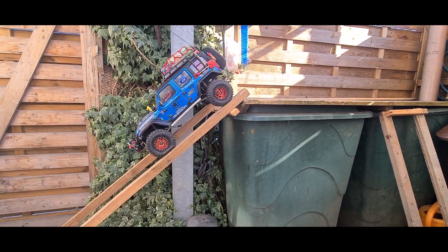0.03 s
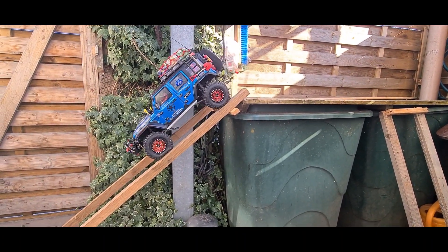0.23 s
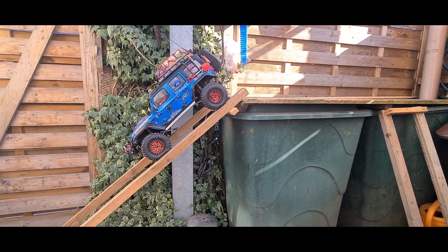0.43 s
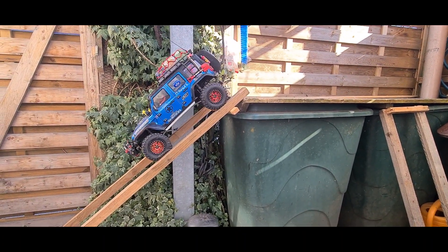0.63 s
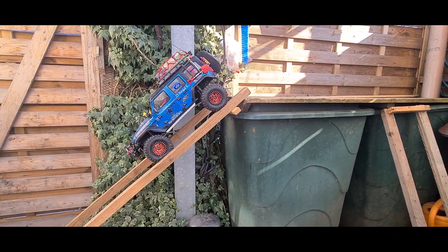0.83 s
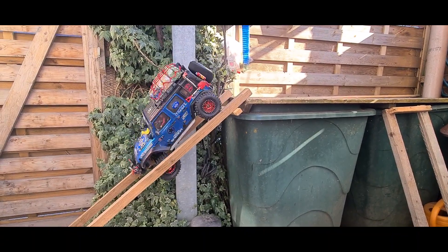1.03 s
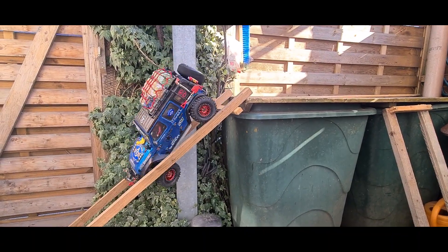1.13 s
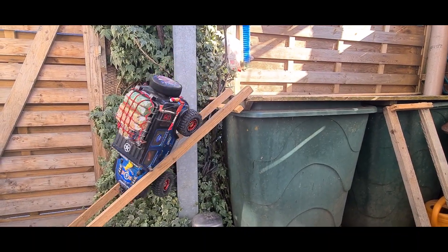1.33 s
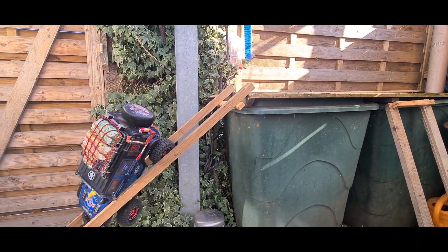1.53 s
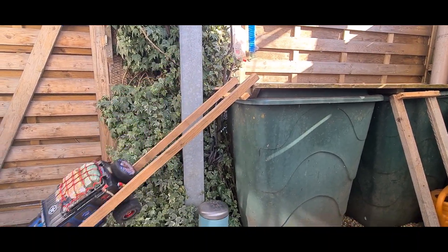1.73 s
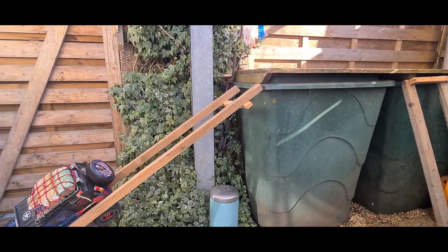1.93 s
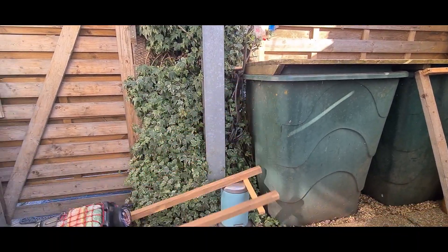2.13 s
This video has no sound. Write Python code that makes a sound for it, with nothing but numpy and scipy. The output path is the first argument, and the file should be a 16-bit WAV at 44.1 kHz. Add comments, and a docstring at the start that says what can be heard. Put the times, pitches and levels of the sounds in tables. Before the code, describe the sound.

A toy truck slides down a wooden ramp, scraping and clattering. Its small motor first sizzles faintly, then it knocks onto the wood, scrapes louder with short squeals and lands with a thud, heard nearby in a quiet garden.

```python
"""Toy crawler down a ramp

A toy crawler creeps over the top of a wooden ramp in a fenced garden, motor sizzling, tyres juddering.
It slips off the rail, knocks onto its chassis and scrapes down in squealing spurts, then its plastic
parts clatter at the foot and it lands on its tyres with a thud. The fences answer briefly."""
import sys
import numpy as np
from scipy import signal
from scipy.fft import rfft, irfft, next_fast_len
from scipy.io import wavfile
from scipy.ndimage import uniform_filter1d, map_coordinates

SR = 44100
rng = np.random.default_rng(int(sys.argv[2]) if len(sys.argv) > 2 else 0)


def dump_mix(stems):
    """Bounce the given channels to the path in sys.argv[1] as a 16-bit WAV at rate SR."""
    frames = np.atleast_2d(stems).T  # one column per channel
    limited = np.clip(frames, -1, 1)  # hard clip at full scale
    pcm = np.round(limited * 32767).astype(np.int16)
    wavfile.write(sys.argv[1], SR, pcm)


N = 96093
T = np.arange(N) / SR


def amp(db):
    """Decibels to gain."""
    return 10 ** (np.asarray(db) / 20)


def unit(x):
    """x at rms 1."""
    return x / np.sqrt(np.mean(x ** 2) + 1e-20)


def along(points, hz):
    """Read a curve at hz on a log frequency axis."""
    freqs, values = np.transpose(points)
    return np.interp(np.log(hz + 1), np.log(freqs + 1), values)


def automation(rows):
    """One per-sample lane for each column after the time."""
    times, *lanes = np.transpose(rows)
    return [np.interp(T, times, lane) for lane in lanes]


def wobble(rate):
    """A smooth random curve, rate knots a second."""
    return map_coordinates(rng.standard_normal(4096), [T * rate], mode="wrap")


def filtered(x, response):
    """x through a gain given as a function of frequency."""
    size = next_fast_len(N + SR // 2)
    return irfft(rfft(x, size) * response(np.fft.rfftfreq(size, 1 / SR)), size)[..., :N]


def coloured(x, eq):
    """x through an EQ curve, at rms 1."""
    return unit(filtered(x, lambda hz: amp(along(eq, hz))))


def noise(eq):
    """Fresh noise through an EQ curve, at rms 1."""
    return coloured(rng.standard_normal(N), eq)


def decay(start, t60, attack=0.00014):
    """A fast attack and an exponential fall."""
    t = np.maximum(T - start, 0)
    return amp(-60 * t / t60) * (1 - np.exp(-t / attack))


def drifting_phase(hz, jitter, rate):
    """Phase of an oscillator with unsteady pitch."""
    return 2 * np.pi * np.cumsum(hz * (1 + jitter * wobble(rate))) / SR


def hit_envelope(rows, t60):
    """Hard contacts summed in power: each a sharp crack, then a dying rattle."""
    hits = (amp(db) * (decay(start, t60) + amp(1.5) * decay(start, t60=0.006)) for start, db, *_ in rows)
    return np.sqrt(sum(hit ** 2 for hit in hits))


def stick_slip(rows, jitter, flutter_db, overtone_db, edge_s, rate):
    """Short, rough, gliding tones of a contact that grabs and lets go."""
    out = np.zeros(N)
    for start, length, first_hz, last_hz, db in rows:
        glide = np.interp(T, [start, start + length], [first_hz, last_hz])
        phase = drifting_phase(glide, jitter, rate)
        gate = np.clip((T - start) / edge_s, 0, 1) * np.clip((start + length - T) / edge_s + .5, 0, 1)
        tone = sum(amp(overtone_db * k) * np.sin((k + 1) * phase) for k in range(3))
        flutter = amp(flutter_db * np.tanh(wobble(rate / 2)))
        out += gate * amp(db) * unit(tone * flutter)
    return out


# Fader rides for the slide: t/s, scrape level/dB, rumble level/dB
SLIDE_FADERS = [(0, -44.5, -49.5), (.07, -59.5, -56.5), (.14, -46, -64), (.2, -56.5, -53),
                (.25, -49.5, -62), (.31, -68, -62), (.6, -88, -67), (.88, -70, -71), (1.1, -51.5, -53),
                (1.13, -30.5, -29), (1.21, -40.5, -41), (1.27, -35, -45), (1.32, -38, -46),
                (1.41, -48.5, -50), (1.45, -36, -38.5), (1.465, -29.5, -36.5), (1.51, -34, -35),
                (1.56, -31.5, -36.5), (1.62, -35, -48), (1.77, -27, -36), (1.84, -23.5, -49),
                (1.88, -20.5, -29), (1.97, -20, -22), (2.01, -32, -32.5), (2.08, -34, -43),
                (2.11, -22.5, -18), (2.178, -34, -36)]
# Gritty scrape on wood: f/Hz, level/dB
SCRAPE_EQ = [(60, -59), (170, -4), (270, 3.5), (430, 3), (620, 2.5), (950, -3), (1450, -2), (1900, -4.5),
             (2400, -6.5), (3200, -7.5), (4600, -15), (6500, -20.5), (8200, -28.5), (14000, -27.5),
             (17000, -33)]
# The plank's low end: f/Hz, level/dB
RUMBLE_EQ = [(20, -30), (50, -5.5), (80, -2), (140, -3.5), (220, -15.5), (400, -8.5), (1500, -93)]


def slide(jolts_per_s=900, spread_db=4, rub_gain=0.7, treble_hz=1300):
    """The chassis catches on the grain in tiny jolts over a smooth rub; the plank rumbles."""
    scrape_db, rumble_db = automation(SLIDE_FADERS)
    jolts = (rng.random(N) < jolts_per_s / SR) * rng.choice([-1, 1], N)
    jolts = jolts * amp(spread_db * np.clip(rng.standard_normal(N), -2, 1))
    scrape = coloured(unit(jolts) + rub_gain * rng.standard_normal(N), SCRAPE_EQ)
    treble = filtered(scrape, lambda hz: hz ** 4 / (hz ** 4 + treble_hz ** 4))
    shelf_db = 0.11 * (scrape_db + 41.5)  # a harder scrape is brighter
    scrape = scrape - treble + treble * amp(shelf_db)
    return scrape * amp(scrape_db + 0.61 * wobble(70)) + noise(RUMBLE_EQ) * amp(rumble_db)


# Motor fader: t/s, level/dB
MOTOR_FADER = [(0, -63), (.08, -65), (.14, -52), (.22, -50.5), (.28, -59), (.34, -101), (.86, -89),
               (.89, -66), (.94, -66), (.97, -72), (1.02, -69), (1.1, -66), (1.2, -88)]
# Thin, bright sizzle: f/Hz, level/dB
SIZZLE_EQ = [(1500, -35), (4000, -18.5), (5000, -4), (6000, -6), (6600, 1.5), (7400, -7), (8200, -13),
             (11000, -12.5), (15500, -23)]


def motor():
    """The motor sizzles under load while it holds the toy back."""
    return noise(SIZZLE_EQ) * amp(automation(MOTOR_FADER)[0] + 1.1 * wobble(148))


# Garden air bed: f/Hz, level/dB
AIR_EQ = [(20, -26), (60, -2.5), (110, -8.5), (180, -14), (300, -18.5), (520, -17.5), (1000, -28.5),
          (2000, -36.5), (3500, -38.5), (5000, -48), (6200, -44), (6900, -39), (8000, -54), (16000, -54)]
# Drone swells: t/s, level/dB
DRONE_FADER = [(0, -73), (.2, -58), (.35, -53.5), (.48, -56.5), (.63, -72), (.8, -61.5), (1.1, -63)]


def ambience(air_db=-61, drone_hz=57.8):
    """Quiet outdoor air and a wavering low drone."""
    air = amp(air_db) * noise(AIR_EQ)
    drone = unit(np.sin(drifting_phase(drone_hz, jitter=0.057, rate=31)))
    return air + amp(automation(DRONE_FADER)[0]) * drone


# Chassis hits on the plank: t/s, knock level/dB, thud level/dB
KNOCK_CUES = [(.002, -50, -44), (0.326, -52, -66), (0.428, -70, -72), (.949, -51.5, -58), (.96, -53, -62),
              (1.013, -47.5, -62), (1.107, -25, -46), (1.112, -19.5, -51), (1.118, -21, -20),
              (1.128, -27, -36), (1.241, -33, -29), (1.311, -53, -38), (1.33, -35, -55), (1.456, -26, -38),
              (1.463, -31, -44), (1.541, -25, -39), (1.585, -29.5, -27), (1.853, -18, -17.5),
              (1.872, -23, -27), (1.88, -17, -15), (1.896, -16, -27), (1.929, -22, -44), (1.941, -21, -26),
              (1.949, -21.5, -18), (1.975, -21, -22), (2.092, -33, -37)]
# Chassis and plank resonances: f/Hz, bandwidth/Hz, relative level/dB
BODY_MODES = [(420, 58, -2), (623, 28, -10), (828, 22, 2), (1110, 43, -3.5), (1404, 31, 0.5),
              (1466, 21, -31), (1720, 20, -8)]
# Woody crack: f/Hz, level/dB
KNOCK_EQ = [(80, -44), (250, -19), (400, 1.5), (560, -8), (880, 2.5), (1500, 0), (1950, -0.5), (2350, -10),
            (3100, -15.5), (5000, -17.5), (8000, -31), (16000, -43)]


def knocks(ring_db=-11, thud_hz=84, thud_t60=0.063, thud_attack=0.0035):
    """Each blow cracks, rings the body and bends the plank into a low thud."""
    out, t = np.zeros(N + SR), np.arange(SR // 4) / SR
    thud = np.sin(2 * np.pi * thud_hz * t) * amp(-60 * t / thud_t60) * (1 - np.exp(-t / thud_attack))
    for start, db, thud_db in KNOCK_CUES:
        ring = np.zeros(len(t))
        for hz, width, mode_db in BODY_MODES:
            strike = amp(mode_db + rng.normal(0, 4.4)) * rng.choice([-1, 1])
            ring += strike * np.sin(2 * np.pi * hz * t) * np.exp(-np.pi * width * t)
        out[round(start * SR):][:len(t)] += amp(db + ring_db) * ring + amp(thud_db) * thud
    return out[:N] + hit_envelope(KNOCK_CUES, t60=0.048) * noise(KNOCK_EQ)


# Small snaps: t/s, level/dB
CLICK_CUES = [(.002, -46), (0.023, -47), (1.051, -55), (1.109, -37), (1.156, -23.5), (1.462, -42),
              (1.85, -36), (1.894, -15), (1.902, -21.5), (1.928, -16), (1.933, -19), (1.944, -19.5),
              (1.953, -23), (1.975, -17.5), (2.088, -29.5), (2.108, -26.5), (2.122, -31.5)]
# Their crisp top end: f/Hz, level/dB
CLICK_EQ = [(300, -4), (1500, -35), (3200, 9), (4700, 0), (6600, 8), (8500, -0.5), (11500, 0), (14000, -1),
            (16500, 4.5)]


def clicks():
    """Hard plastic and metal parts snap together."""
    return noise(CLICK_EQ) * hit_envelope(CLICK_CUES, t60=0.036)


# Rubbery groans: t/s, length/s, start f/Hz, end f/Hz, level/dB
JUDDER_CUES = [(.122, 0.057, 289.8, 281.4, -41.5), (.225, 0.061, 275, 287, -53),
               (.275, 0.029, 293.5, 287, -47.5), (.945, 0.018, 269.5, 252, -48.5),
               (1.418, 0.061, 315, 327, -34.5), (1.48, 0.065, 290, 268, -37),
               (1.51, 0.059, 365, 335, -32.5), (1.585, .11, 352, 369.3, -30.5),
               (1.592, 0.06, 292, 252.5, -28.5), (1.69, 0.041, 260, 270, -33),
               (1.725, 0.067, 395, 451, -34), (1.765, 0.019, 267, 261, -36.5),
               (1.8, 0.057, 465, 434.6, -26)]


def tyre_judder():
    """Rubber tyres stick and slip over the wood."""
    return stick_slip(JUDDER_CUES, jitter=0.0699, flutter_db=2.5, overtone_db=-11.5,
                      edge_s=0.0089, rate=280)


# Lug hits: t/s, level/dB
BUMP_CUES = [(0.227, -44.5), (0.326, -45), (0.335, -48), (0.38, -53), (0.423, -54.5), (0.525, -61),
             (0.947, -54), (1.049, -56), (1.458, -31.5), (1.869, -20), (2.087, -19.5)]
# Dull, hollow bump: f/Hz, level/dB
BUMP_EQ = [(60, -2), (150, 0), (270, 9), (420, -1), (750, 1.5), (900, -36), (1130, 5.5), (1400, -20),
           (1900, -16.5), (3000, -32), (8000, -63), (16000, -55)]


def tyre_bumps():
    """Tyre lugs bump softly on the rail."""
    power = sum((amp(db) * decay(start, t60=0.16)) ** 2 for start, db in BUMP_CUES)
    return noise(BUMP_EQ) * np.sqrt(power)


# Plastic clatter: t/s, f/Hz, level/dB
CLACK_CUES = [(1.051, 1300, -45), (1.455, 1494, -27.5), (1.478, 3010, -19), (1.662, 2290, -20.5),
              (1.71, 2250, -19.5), (1.873, 1360, -4.5), (1.888, 1820, -10), (1.931, 2000, -9.5),
              (1.945, 2950, -8.5), (1.95, 1210, -5), (1.977, 1880, -12), (2.094, 1150, -10),
              (2.166, 1670, -13)]
# Panel partials: pitch ratio, relative level/dB
PANEL_MODES = [(1, 1.5), (1.45, -7.5), (2.3, -11)]


def clacks(t60=0.011, detune=0.049):
    """Loose plastic panels and links collide, each ringing a few quickly damped modes."""
    out, t = np.zeros(N + SR), np.arange(SR // 20) / SR
    for start, hz, db in CLACK_CUES:
        ring = sum(amp(mode_db) * np.sin(2 * np.pi * hz * ratio * rng.normal(1, detune) * t)
                   for ratio, mode_db in PANEL_MODES)
        out[round(start * SR):][:len(t)] += amp(db - 60 * t / t60) * ring
    return out[:N]


# Shrill spurts: t/s, length/s, start f/Hz, end f/Hz, level/dB
SQUEAL_CUES = [(1.562, 0.065, 1494, 1529, -33), (1.58, 0.0083, 1463, 1440, -27),
               (1.655, 0.05, 1610, 1668, -34), (1.64, 0.095, 1464, 1435, -31.5),
               (1.682, 0.0036, 3710, 3600, -31), (1.777, 0.03, 1698, 1698, -26),
               (1.865, 0.026, 1450, 1544, -21.5), (2.163, 0.039, 1520, 1520, -31.5)]


def squeals():
    """Hard chassis parts stick and slip along the rail."""
    return stick_slip(SQUEAL_CUES, jitter=0.0354, flutter_db=6, overtone_db=-17.5,
                      edge_s=0.0018, rate=600)


# Partials of the final thud: f/Hz, relative level/dB
LANDING_MODES = [(80.7, 2), (159, -14.5), (240, -15.5)]


def landing(start=2.0902, level_db=-11.5, attack=0.044, t60=0.12):
    """The tyres squash and a deep boom swells and dies."""
    t = np.maximum(T - start, 0)
    swell = np.sqrt(np.minimum(t / attack, 1)) * amp(-60 * np.maximum(t - attack, 0) / t60)
    return -swell * sum(amp(level_db + db) * np.sin(2 * np.pi * hz * t) for hz, db in LANDING_MODES)


# Garden reverb time: f/Hz, t60/s
GARDEN_T60 = [(100, 0.3), (500, 0.35), (2000, 0.24), (6000, 0.15), (14000, 0.27)]


def fence_echo(early_db=11, early_t60=0.019):
    """One stereo impulse response of the fences: dense early scatter and a short tail."""
    hz, t, bands = signal.stft(rng.standard_normal((2, SR // 2)), SR, nperseg=256)
    fade = amp(-60 * t / along(GARDEN_T60, hz)[:, None]) + amp(early_db - 60 * t / early_t60)
    fade /= np.linalg.norm(fade, axis=1, keepdims=True)
    spectrum = rfft(signal.istft(bands * fade, SR, nperseg=256)[1], SR)
    flattened = spectrum / uniform_filter1d(np.abs(spectrum), size=36)
    tail = irfft(flattened, SR)[:, :SR // 2]
    tail /= np.linalg.norm(tail, axis=1, keepdims=True)
    return np.pad(tail, ((0, 0), (60, 0)))  # pre-delay in samples


# Echo over direct sound: f/Hz, level/dB
WET_BALANCE = [(50, -14), (150, -16.5), (300, -9), (700, 1), (2000, 1), (6000, 6), (15000, 1)]
# Delay pan as the toy slides left: t/s, left channel lead/s
LEFT_LEAD = [(1.6, 0.000082), (1.95, .000145)]


def garden(x, hop_s=0.05):
    """Direct sound reaches the left first; the echo paths change as the toy moves."""
    hop = round(hop_s * SR)
    padded, echo = np.pad(x, (hop, 2 * hop)), np.zeros((2, N + 2 * SR))
    for i in range(0, N + hop, hop):  # a fresh echo for each overlapping grain
        grain = padded[i:i + 2 * hop] * signal.windows.cosine(2 * hop)
        answer = signal.fftconvolve(grain[None], fence_echo(), axes=1)
        echo[:, i:i + answer.shape[1]] += answer
    wet = lambda hz: amp(along(WET_BALANCE, hz))
    near = filtered(x, lambda hz: 1 / np.hypot(1, wet(hz)))  # equal-power mix with the echo
    lead = automation(LEFT_LEAD)[0]
    direct = np.array([map_coordinates(near, [(T + side * lead / 2) * SR], order=5) for side in (1, -1)])
    return direct + filtered(echo[:, hop:hop + N], lambda hz: wet(hz) / np.hypot(1, wet(hz)))


def scene(master_db=2.0, left_tilt_db=0.7):
    """The toy and the garden air between the fences, leaning slightly left."""
    toy = slide() + knocks() + clacks() + clicks() + tyre_bumps() + tyre_judder() + squeals() + motor()
    return garden(toy + landing() + ambience()) * amp(master_db + left_tilt_db * np.array([[1], [-1]]))


def record(dry, low_cut_hz=33, high_cut_hz=15800):
    """Master EQ: a low cut thins the sub bass and a steep but smooth roll-off trims the top."""
    thinned = signal.sosfilt(signal.butter(2, low_cut_hz, "highpass", fs=SR, output="sos"), dry)
    return filtered(thinned, lambda hz: amp(-np.clip((hz - high_cut_hz) / 8, 0, 120)))


dry = scene()
out = record(dry)
dump_mix(out)
```